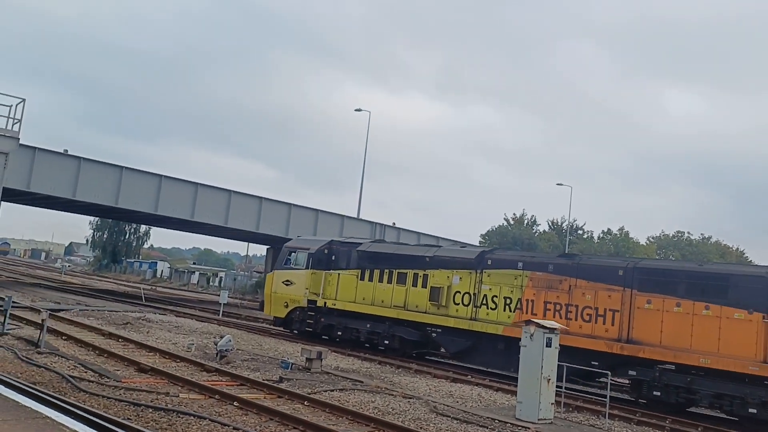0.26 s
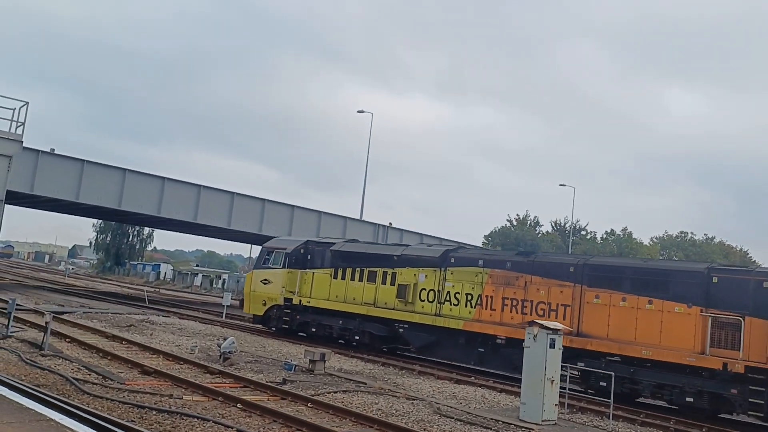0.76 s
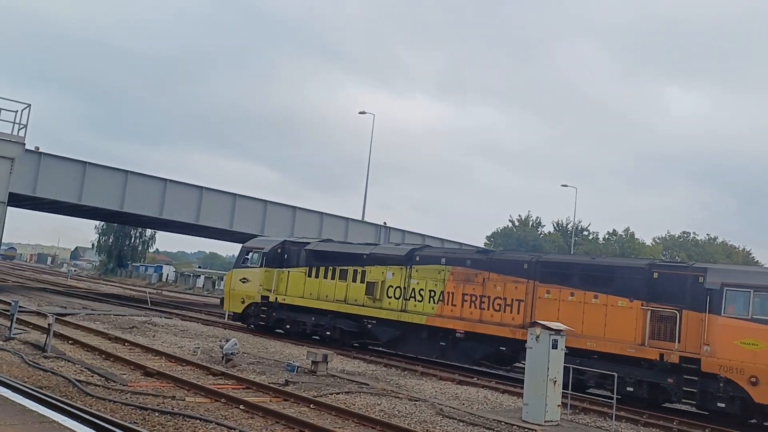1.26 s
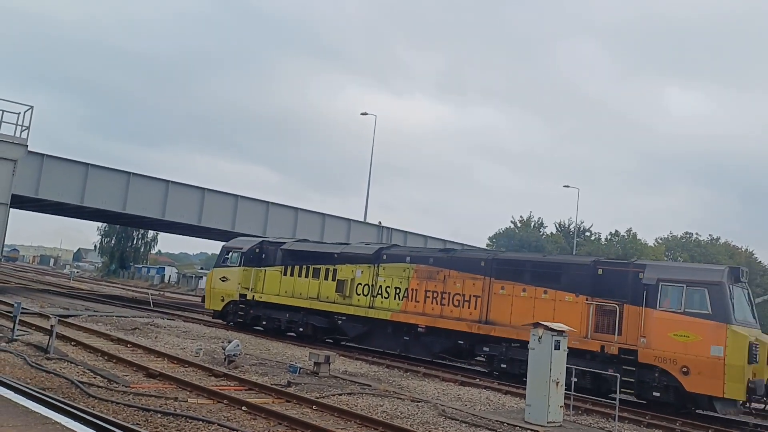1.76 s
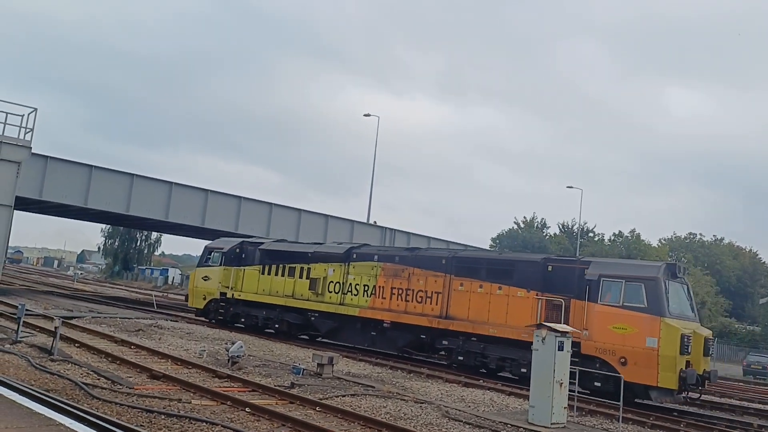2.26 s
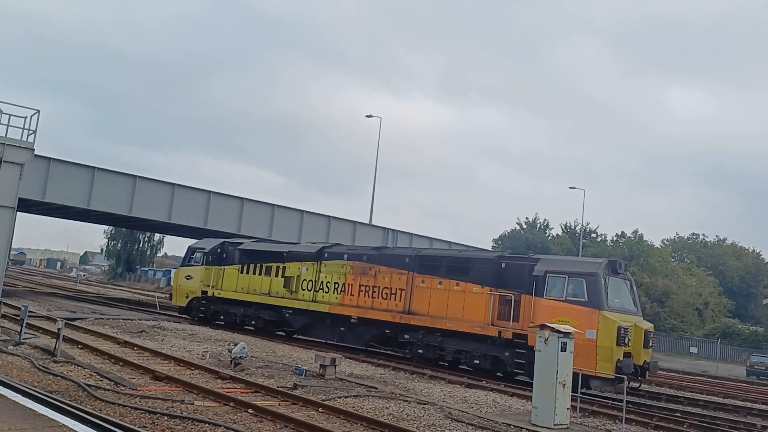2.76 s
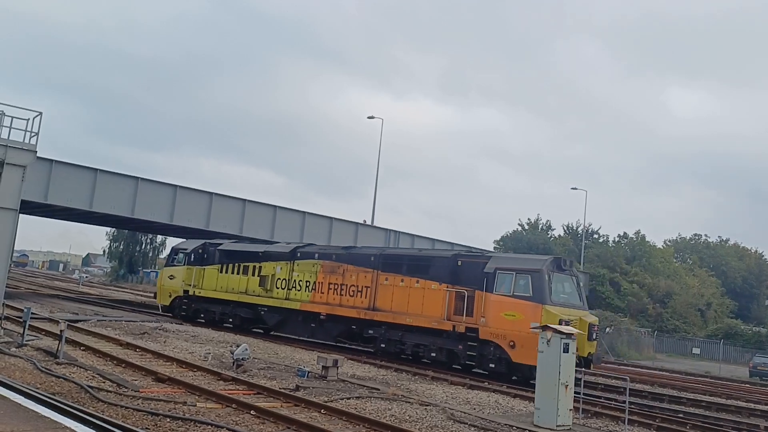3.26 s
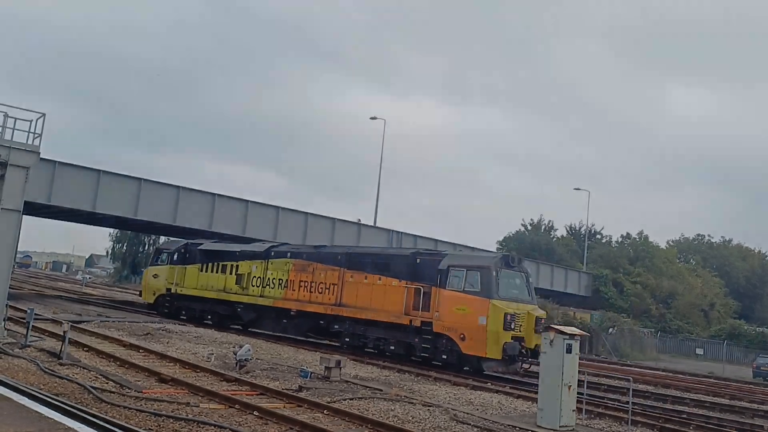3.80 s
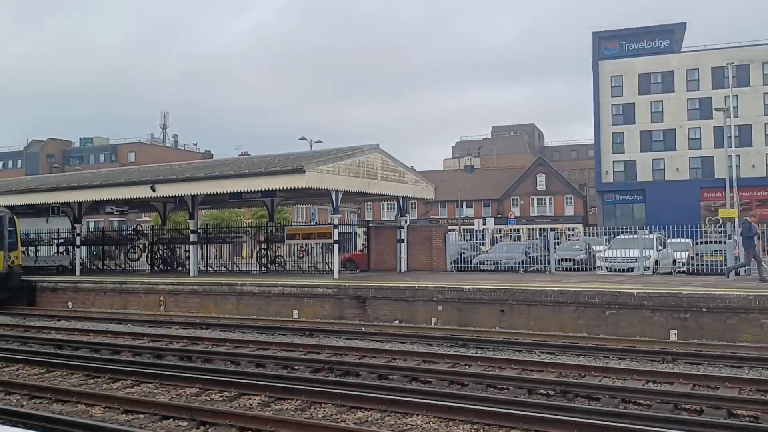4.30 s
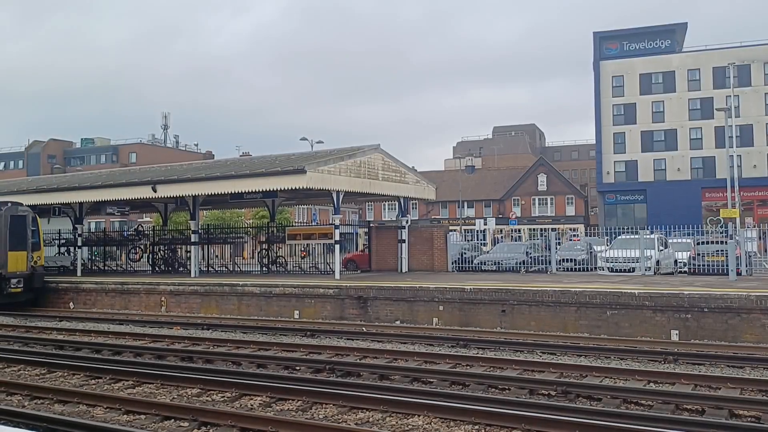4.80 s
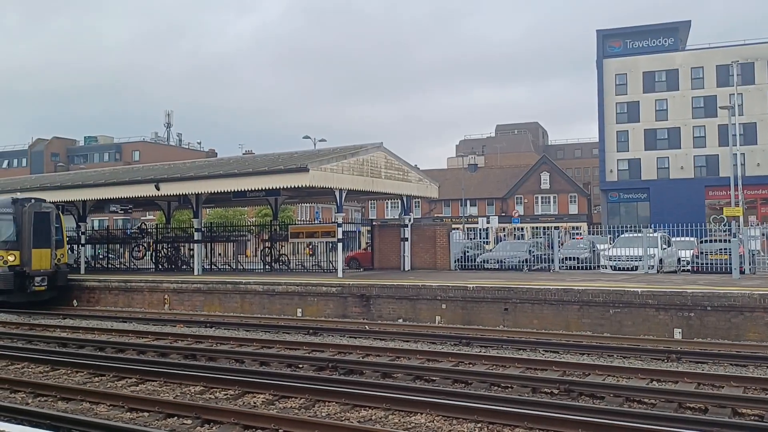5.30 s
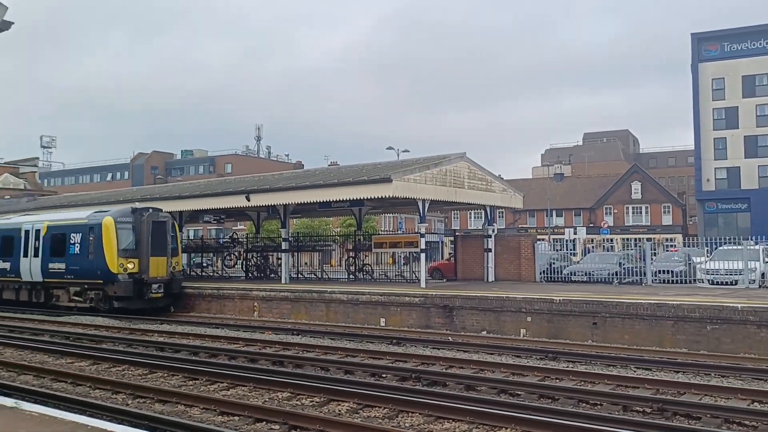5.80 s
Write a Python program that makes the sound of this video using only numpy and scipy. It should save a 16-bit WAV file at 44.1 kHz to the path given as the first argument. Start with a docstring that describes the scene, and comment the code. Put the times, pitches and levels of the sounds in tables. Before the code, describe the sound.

A diesel locomotive drones, whines, squeals and clunks over rail joints; after a cut, an engine idles and rails hiss under an arriving train.

```python
"""Diesel locomotive, then a station

A diesel locomotive rolls slowly away across a rail yard. Its uneven firings make the exhaust throb,
its gears whine higher, a wheel's rim (the flange) sticks and slips with a squeal, and the wheels
rumble over points and thump at rail joints. The sound is cut off. After a short silence a station
fades in: an engine idles further off and an electric train runs in, hissing on the rails."""
import sys
import numpy as np
from scipy import signal
from scipy.fft import rfft, irfft, next_fast_len
from scipy.io import wavfile
from scipy.ndimage import map_coordinates

SR = 44100
rng = np.random.default_rng(int(sys.argv[2]) if len(sys.argv) > 2 else 0)


def master(y):
    """Save y as 16-bit WAV."""
    cut = np.clip(np.atleast_2d(y).T, -1, 1)
    pcm = np.round(cut * 32767)  # scale
    wavfile.write(sys.argv[1], SR, pcm.astype(np.int16))


N = 266805
YARD, STATION, TRAIN = 0, 1, 2   # which part of a table to use


# An "order" is a tone at a whole multiple of the engine's cycle rate.
# Loudness of the main order: time_s, level_db
THROB = [(0, -23), (.55, -24.5), (.82, -19), (1.05, -27), (1.6, -21), (2.1, -27.5), (2.5, -19), (2.9, -23),
         (3.4, -18), (3.7, -18.5), (4.05, -25.5), (4.22, -35), (4.36, -45), (4.5, -37), (4.75, -26.5),
         (5.05, -24.5), (5.3, -27), (5.6, -24), (6.05, -27.5)]
# Orders with a loudness of their own: order, yard_db, yard_change_db_per_s, station_db
FREE_ORDERS = [(8, -29, -5, -49), (9, -33, -3.5, -41), (11, -24.5, -2.2, -36), (15, -34, .5, -28),
               (24, -35, .7, -37)]
# Weak orders that follow the main one: order, relative_db
WEAK_ORDERS = [(10, -13), (12, -34.5), (14, -18.5), (16, -26.5), (17, -26), (21, -31), (22, -22)]

def exhaust(place, cycle_hz, main_order=13):
    """Uneven firings repeat every cycle, making a stack of tones, staggered so that the drone wobbles."""
    main_db = in_time(THROB)[0]
    orders = [(main_order, main_db, .5)]
    orders += [(round(k), layer_db(place, *db) + 1.8 * drift(.29), 1.2) for k, *db in FREE_ORDERS]
    orders += [(round(k), main_db + db, 3) for k, db in WEAK_ORDERS]
    head_start_s = (.043, -.017)[place]
    return sum(sine(k * cycle_hz, db, waver_db, start_turns=k ** 2 / 16 + k * cycle_hz * head_start_s)
               for k, db, waver_db in orders)


# Five layers of engine noise, low to high. All but the first have a yard list and a station list.
# The tone colour of each: pitch_hz, relative_db
CHUFF_COLOUR = [(15, -41.5), (25, -13), (46, -2), (70, -2), (86, -2.5), (118, -2), (150, -6.5),
                (200, -47.5), (330, -120)]
RUMBLE_COLOUR = [(76, -45.5), (130, -15.5), (161, -8), (184, -2), (210, -5), (274, 2), (288, -5.5),
                 (335, -11.5), (430, -22.5), (560, -63), (950, -120)], [(76, -19), (130, -7), (150, -13),
                 (162, -9.5), (242, 0), (317, -4), (430, -11.5), (560, -17.5), (950, -120)]
ROAR_COLOUR = [(240, -31), (400, -15), (493, -3.5), (576, -3.5), (627, -1.5), (665, -4), (830, -2.5),
               (958, -12.5), (1070, -6), (1270, -6), (1330, -3), (1450, -13.5), (1570, -13), (1680, -17.5),
               (1900, -16), (2470, -26.5), (4180, -120)], [(240, -66), (400, -13), (523, -7.5),
               (543, -10.5), (607, -6), (661, -7), (869, -6.5), (1900, -17), (2470, -44), (4180, -120)]
FAN_COLOUR = [(1000, -32), (1700, -7.5), (2140, -3), (2390, -9), (2530, 2), (2660, 2), (3140, -3),
              (4090, -9.5), (4770, -5.5), (5450, -9.5), (5720, -6.5), (5960, -6), (6440, -10.5),
              (7510, -13.5), (9000, -24), (11700, -58), (19800, -120)], [(1000, -38), (1700, -13),
              (2020, -5), (2480, -2), (3560, -2.5), (4740, -7.5), (5410, -6.5), (6530, -17), (7880, -16),
              (9000, -32), (11700, -58), (19800, -120)]
LEAK_COLOUR = [(5000, -25.5), (8500, -9.5), (9240, -16.5), (10100, -13.5), (11300, -10.5), (12000, -9),
               (15800, -16)], [(5000, -34), (8500, -13), (9580, -6), (12100, -7), (14200, -8), (15800, -16)]
# Loudness of those five layers: yard_db, yard_change_db_per_s, station_db
LAYER_LEVELS = [(-26, -2, -30), (-31, 1.27, -33), (-33, -0.74, -37.5), (-45.5, -1, -48.5), (-64, -1, -69.5)]
# How unsteady each layer is: flicker_db, slow_wander_db
LAYER_FLICKER = [(1.5, 1), (1, 1), (.5, .7), (.6, .4), (.3, .3)]
# The rumble swells over points, where tracks branch: start_s, peak_db, hold_s
POINTS = [(-.05, -21.5, 0.022), (1.883, -24, 0.55), (2.598, -25, 0.17), (2.788, -21.5, 0.045),
          (3.185, -21.5, 0.2), (4.2, -34, 0.17), (5.553, -29, 0.032)]
# Soft puffs of escaping air: start_s, peak_db, hold_s
AIR_PUFFS = [(1.693, -65, .02), (1.94, -64, .03), (2.51, -68.5, .04), (3.17, -63.5, .2)]

def engine_noise(place):
    """Exhaust chuff, wheel rumble, roar, fan hiss and leaking air, returned as a low and a high part."""
    shared_flicker = drift(12)
    chuff, rumble, roar, fan, leak = (from_db(layer_db(place, *db)) for db in LAYER_LEVELS)
    # In the yard, fan and leak sink first as the engine draws away.
    dulling = from_db(-3 * seconds_after(2.8)) if place == YARD else 1
    points_power = sum(swell(s, db, .026, hold_s, 46.5) ** 2 for s, db, hold_s in POINTS)
    puffs_power = sum(swell(s, db, .02, hold_s, 147) ** 2 for s, db, hold_s in AIR_PUFFS)
    rumble = np.sqrt(rumble ** 2 + points_power)
    leak = np.sqrt((leak * dulling) ** 2 + puffs_power)
    gains = chuff, rumble, roar, fan * dulling, leak
    colours = (CHUFF_COLOUR, RUMBLE_COLOUR[place], ROAR_COLOUR[place],
               FAN_COLOUR[place], LEAK_COLOUR[place])
    layers = []
    for gain, colour, (flicker_db, wander_db) in zip(gains, colours, LAYER_FLICKER):
        unsteady_db = flicker_db * (shared_flicker + drift(40)) + wander_db * drift(1.9)
        layers.append(gain * from_db(unsteady_db) * noise(colour, place))
    return sum(layers[:2]), sum(layers[2:])


# Loudness of the gear whine: time_s, level_db
GEAR_LEVELS = [(0, -47.5), (.55, -29), (.85, -38), (1.1, -26), (1.35, -33.5), (1.55, -25.5), (1.7, -29.5),
               (1.8, -34.5), (1.95, -20.5), (2.3, -46.5), (2.7, -39.5)]

def gear_whine(start_hz=227.8, rise_hz_per_s=14.8):
    """Meshing gear teeth make a rising whine; a second, higher one soon fades."""
    hz = start_hz + rise_hz_per_s * clock()
    upper_db = -31 - 17.5 * seconds_after(.12)
    return sine(hz, in_time(GEAR_LEVELS)[0], waver_db=.6) + sine(hz * 4 / 3, upper_db, waver_db=1.5)


# Surges of the hum: start_s, peak_db, hold_s, fall_db_per_s
HUM_SURGES = [(2.044, -17, 0.1, 27.5), (2.398, -24.5, 0.12, 64.5), (2.673, -27, 0.054, 77),
              (2.829, -19.5, 0.07, 248), (3.075, -23.5, 0.025, 148), (3.244, -33, 0.28, 47),
              (3.676, -28, 0.15, 44)]
# Faint engine-room tones: pitch_hz, above_fan_db
ROOM_TONES = [(623, 3), (865, -4.5), (1262, -4.5)]

def engine_hum(hum_hz=277.3):
    """A hum surges again and again over faint tones that slowly sink with the fan hiss."""
    surges = [swell(s, db, .039, hold_s, fall) for s, db, hold_s, fall in HUM_SURGES]
    hum = np.max(surges, axis=0) * sine(hum_hz, 0, waver_db=.96)
    fan_db = layer_db(YARD, *LAYER_LEVELS[3])
    return hum + sum(sine(hz + 5.07 * drift(14.8), db + fan_db, waver_db=2.5) for hz, db in ROOM_TONES)


# Squealing notes: start_s, pitch_hz, glide_hz_per_s, level_db, attack_s, hold_s
SLIP_NOTES = [(.83, 2706, 100, -35, .035, .012), (.95, 1878, 260, -38, .07, .075),
              (.958, 3808, 0, -46, .012, .25), (.972, 3238, 0, -47, .012, .1),
              (1.3, 3808, 0, -55, .02, .12)]
# For each note, its harmonics from the lowest up: relative_db
SLIP_HARMONICS = (0, -11, -20), (0,), (0,), (0,), (0,)
# The flange bites, grinds and rubs again: start_s, relative_db, attack_s, hold_s, fall_db_per_s
FRICTION = [(0.851, -29.5, 0.008, 0.024, 79), (.87, -34.5, 0.05, 0.033, 85), (1.26, -47, 0.024, 0.025, 80)]
# Tone colour of the scraping: pitch_hz, relative_db
SCRAPE_COLOUR = [(1060, -41.5), (1800, -9), (2240, 14), (2360, -17.5), (2640, 13), (3930, -8), (4470, -9),
                 (4890, 4), (8760, -8.5), (9400, -6), (10500, 2), (11700, 3), (13500, 6.5), (14800, 0),
                 (15800, -2)]

def flange_squeal(glide_s=.17):
    """The flange sticks and slips on the rail fast enough to sing; it also scrapes and rings the wheel."""
    notes = np.zeros(N)
    for (s, start_hz, glide, db, attack_s, hold_s), harmonics in zip(SLIP_NOTES, SLIP_HARMONICS):
        hz = start_hz + glide * np.minimum(seconds_after(s), glide_s)
        gain = swell(s, db, attack_s, hold_s, fall_db_per_s=200)
        for k, harmonic_db in enumerate(harmonics, 1):
            notes += gain * sine(k * hz, harmonic_db, waver_db=1.1)
    friction = sum(swell(*rubbing) for rubbing in FRICTION)
    scrape = friction * from_db(-7) * noise(SCRAPE_COLOUR, YARD)
    return notes + arrive(scrape + wheel_ring(friction), lag_ms=-.047)


# A "mode" is a pitch at which an object rings; ring_s is the time it takes to fall by 60 dB.
# The wheel's modes: pitch_hz, relative_db, ring_s
WHEEL_MODES = [(2200, -3, .3), (2580, -6, .5), (3238, -4, 1.0), (3808, -5, 1.3), (4030, -4, .9),
               (4385, -11, .6), (4705, -6, .6), (5008, -1, .4), (5395, -10, .5), (5660, -7, .8),
               (6373, -2, .9), (6650, -10, .7), (7135, -14, .8), (7612, -16, .8), (7895, -14, .8),
               (8236, -4, .4), (9948, -13, .5), (10380, -11, .5), (10970, -4, .7), (11468, -4, .6),
               (11975, 0, .6), (12530, -1, .6), (13122, -6, .5), (13394, -7, .4), (13822, -6, .6),
               (14112, 3, .35), (14650, -1, .3), (14740, -2, .35), (15235, -8, .4), (15493, 2, .35)]

def wheel_ring(friction, start_s=.8, end_s=1.9, steadiness=.35):
    """Rubbing feeds energy into each mode of the wheel, where it builds up and dies away."""
    out = np.zeros((2, N))
    span = slice(int(start_s * SR), int(end_s * SR))
    shared, *each_ear = rng.standard_normal((3, N))[:, span]
    rub = shared + .8 * np.array(each_ear)
    for hz, db, ring_s in WHEEL_MODES:
        decay = from_db(-120 / (ring_s * SR))
        build_up = np.exp(-1 / (.045 * ring_s ** 2 * SR))   # long-ringing modes are slow to start
        feedback = np.convolve([1, -decay], [1, -build_up])
        energy = signal.lfilter([(1 - decay) * (1 - build_up)], feedback, friction[span] ** 2)
        blur_s = 1 / (1 + hz / 950)   # the turning wheel blurs each mode's pitch
        pole = from_db(-60 / (blur_s * SR)) * np.exp(2j * np.pi * hz / SR)
        mode = signal.lfilter([1], [1, -pole], rub)
        evened = rms_one(mode.real / np.abs(mode) ** steadiness)   # steady rubbing calms the wavering
        out[:, span] += from_db(db - 10.5) * np.sqrt(energy) * evened
    return out


# Wheels hit rail joints: start_s, relative_db, upper_modes_extra_db
RAIL_JOINTS = [(1.962, -27, -1), (2.079, -6.5, 3), (2.657, -18, -6), (2.726, -9, 2), (2.781, -4.5, 3),
               (2.835, -10, 8), (2.879, -14, -3), (3.058, -6, -2), (3.323, -10, 3), (3.373, -13.5, 14.5),
               (3.474, -11.5, 4), (5.262, -20, 9), (5.607, -17.5, 0)]
# Modes of the frame under the locomotive: pitch_hz, relative_db, ring_s
FRAME_MODES = [(185, 3, .25), (245, 0, .2), (345, -5, .1), (485, 2, .09), (700, 0, .05)]

def joint_thumps(push_s=.001, upper_from_hz=400):
    """A wheel drops at a rail joint, and the short, rough push rings the frame."""
    start_s, peak_db, extra_db = np.transpose(RAIL_JOINTS)
    hits = np.zeros((2, N))
    hits[:, (start_s * SR).astype(int)] = from_db([peak_db, peak_db + extra_db])
    decay = np.exp(-1 / (push_s * SR))
    push = signal.lfilter([1], [1, -2 * decay, decay * decay], hits + 1e-18) / (push_s * SR)
    low_push, upper_push = push * (1 + rng.standard_normal(N))
    return sum(from_db(db - 39.5) * ring(upper_push if hz > upper_from_hz else low_push, hz, ring_s)
               for hz, db, ring_s in FRAME_MODES)


# Loudness of the arriving train: time_s, hiss_db, treble_db
TRAIN_LEVELS = [(4.3, -54, -65), (5.25, -47.5, -61), (5.28, -41.5, -52), (5.33, -43.5, -53),
                (5.4, -43, -52), (5.47, -42, -47.5), (5.52, -41, -52), (5.57, -42.5, -45),
                (5.65, -43, -47.5), (5.72, -41.5, -50), (5.8, -42, -47.5), (6.05, -45, -49.5)]
# Tone colours of its rail hiss, treble and sizzle: pitch_hz, relative_db
RAIL_COLOUR = [(820, -16), (1400, 4.5), (1630, -4.5), (2220, -5), (2600, -3), (2980, -7), (3710, -7.5),
               (6300, -32), (8500, -48), (11000, -67), (18700, -120)]
TREBLE_COLOUR = [(3500, -16), (4200, -1.5), (5000, -3), (6000, -2.5), (6600, -12), (7500, -32)]
SIZZLE_COLOUR = [(8500, -18), (10300, -5), (11500, -2), (13000, -9), (15500, -25)]
# Gusts of sizzle: start_s, peak_db, hold_s
SIZZLE_GUSTS = [(5.508, -65.5, .02), (5.8, -61, .15)]
# Two swells of a thin tone: start_s, peak_db, attack_s, hold_s, fall_db_per_s
THIN_TONE_SWELLS = [(5.585, -37, .03, .065, 350), (5.71, -39.5, .09, .08, 25)]

def electric_train(tone_hz=1272):
    """The rails hiss as the train runs in, with gusts of brighter sizzle and a thin tone."""
    hiss_db, treble_db = in_time(TRAIN_LEVELS)
    hiss = from_db(hiss_db + .5 * drift(9.9)) * noise(RAIL_COLOUR, TRAIN)
    treble = from_db(treble_db) * noise(TREBLE_COLOUR, TRAIN)
    tone_gain = sum(swell(*row) for row in THIN_TONE_SWELLS) * pan(-4)
    tone = tone_gain * sine(tone_hz + 5 * drift(25), 0, waver_db=2.5)
    gusts = sum(swell(s, db, .084, hold_s, 80) for s, db, hold_s in SIZZLE_GUSTS)
    sizzle = (from_db(-76) + gusts) * noise(SIZZLE_COLOUR, TRAIN)
    return arrive(hiss + treble + sizzle + tone, lag_ms=-.28)


def station_drone():
    """A low drone swells once."""
    return swell(5.38, -30, attack_s=.22, hold_s=.05, fall_db_per_s=90) * sine(243, 0, waver_db=.81)


# The turbocharger's whistle: time_s, pitch_hz, level_db
TURBO_WHISTLE = [(0, 6200, -66), (.6, 6150, -77), (1.2, 5750, -62), (1.5, 5760, -54), (1.82, 5620, -54),
                 (2.1, 5900, -51), (2.45, 5880, -60), (2.8, 5760, -56), (3.15, 5950, -54),
                 (3.45, 5880, -54), (3.75, 5800, -62), (4.05, 5750, -74)]

def turbo_whistle(blur_hz=90):
    """A high tone, made breathy by fast random wavering that partly differs in each ear."""
    hz, db = in_time(TURBO_WHISTLE)
    tone = np.exp(2j * np.pi * np.cumsum(hz) / SR)
    shared, *each_ear = [drift(blur_hz) + 1j * drift(blur_hz) for _ in range(3)]
    return from_db(db) * np.real(tone * (shared + np.array(each_ear))) / 2


# Tone colour of the swish: pitch_hz, relative_db
SWISH_COLOUR = [(400, -15), (700, -19), (1500, -1), (2100, 0), (2400, -10), (2700, -10), (4000, -17),
                (6000, -18)]

def wheel_swish():
    """One brief swish comes from the wheels and axles."""
    return swell(3.17, -41, attack_s=.12, hold_s=.11, fall_db_per_s=80) * noise(SWISH_COLOUR, YARD)


# Small metal ticks: start_s, relative_db, left_minus_right_db
TICKS = [(0.118, -42, -2.0), (0.4794, -51, -7), (1.8831, -56, 5), (1.969, -59, -12), (2.553, -51, 2),
         (2.8665, -61, 19), (2.898, -30.5, 5), (2.922, -43.5, -11), (3.495, -52, -13), (3.526, -50, -6),
         (3.8726, -54, -9)]
# The modes they strike: pitch_hz, relative_db, ring_s
TICK_MODES = [(7400, -1, .05), (12100, -3, .06), (12800, -1, .04)]

def metal_ticks(crack_s=.004, tail_s=.025, band_hz=(7000, 14000)):
    """Each tick is a bright crack with a faint tail of hiss; it rings the same modes in its own mix."""
    start_s, peak_db, pan_db = np.transpose(TICKS)
    at = (start_s * SR).astype(int)
    scatter_db = rng.normal(0, 1.7, (len(at), len(TICK_MODES)))
    hits = np.zeros((2, N))
    hits[:, at] = from_db(peak_db) * pan(pan_db)
    crack, tail = (signal.lfilter([1], [1, -np.exp(-1 / (s * SR))], hits + 1e-18)
                   for s in (crack_s, tail_s))
    burst = (crack + from_db(-18) * tail) * rng.standard_normal(N)
    out = from_db(-4.5) * signal.sosfilt(signal.butter(3, band_hz, "band", fs=SR, output="sos"), burst)
    for k, (hz, db, ring_s) in enumerate(TICK_MODES):
        clicks = np.zeros((2, N))
        clicks[:, at] = hits[:, at] * from_db(db - 10 + scatter_db[:, k])
        out += ring(clicks, hz, ring_s)
    return out


# How alike the two ears are, for yard, station and train: pitch_hz, likeness (1 = the same)
EAR_LIKENESS = ([(60, .88), (200, .98), (320, .97), (400, 0.63), (650, 0.87), (1000, 0.5), (1500, 0.5),
                (2200, .5), (3100, .5), (5000, -0.01), (15000, 0.04)], [(60, 0.99), (200, 0.98), (400, 0.5),
                (650, 0.3), (1000, 0.5), (1500, 0.6), (2200, 0.5), (2800, .3), (3300, .6), (4000, 0.6),
                (5500, 0.15), (15000, 0.1)], [(800, .4), (1400, .5), (2200, .4), (3000, .15), (4000, .3),
                (5000, .1), (15000, .1)])
# Which ear is louder, for the same three: pitch_hz, left_minus_right_db
EAR_BALANCE = [(60, -8), (130, -2.5), (290, 0), (640, -1.5), (1410, -2.5), (3100, -1), (6820, -2.5),
               (15000, 0.5)], [(60, -4), (130, 7), (290, -0.5), (640, -2), (1410, -5), (3100, -5),
               (6820, -0.5), (8000, 9), (15000, 22)], [(800, 0), (1400, -7.5), (2200, -8.5), (3300, -15.5),
               (5000, -25), (6500, -15), (11000, -10), (15000, -6)]

def noise(colour, place):
    """Stereo noise of a given tone colour; the average of the two ears has strength (rms) 1."""
    size = next_fast_len(N)
    hz = np.arange(size // 2 + 1) * SR / size
    inside = (hz >= colour[0][0]) & (hz <= colour[-1][0])
    mid, side = rfft(rng.standard_normal((2, size))) * from_db(at_hz(colour, hz)) * inside
    alike = np.clip(at_hz(EAR_LIKENESS[place], hz), -.99, .99)
    pair = np.sqrt(1 + alike) * mid + np.sqrt(1 - alike) * side * [[1], [-1]]
    out = irfft(pair * pan(at_hz(EAR_BALANCE[place], hz)), size)[:, :N]
    return out / np.sqrt(np.mean(out.mean(axis=0) ** 2))


def sine(hz, db, waver_db, start_turns=None):
    """A pure tone whose strength wavers around db in moving air."""
    turns = np.cumsum(hz * np.ones(N)) / SR + (rng.random() if start_turns is None else start_turns)
    return np.sqrt(2) * from_db(db + waver_db * drift(13)) * np.sin(2 * np.pi * turns)


def ring(drive, hz, ring_s):
    """One mode: a click of height 1 starts a dying tone of height 1."""
    decay, step = from_db(-60 / (ring_s * SR)), 2 * np.pi * hz / SR
    return signal.lfilter([0, np.sin(step)], [1, -2 * decay * np.cos(step), decay ** 2], drive + 1e-18)


def arrive(pair, lag_ms):
    """Sound from one side reaches the left ear lag_ms after the right (before it, if negative)."""
    read_at = 8 + np.arange(N) - lag_ms * SR / 1000 * np.array([[.5], [-.5]])
    padded = np.pad(pair, ((0, 0), (16, 16)), "reflect", reflect_type="odd")
    return np.array([map_coordinates(ear, [at], order=3) for ear, at in zip(padded, read_at)])


def pan(left_minus_right_db):
    """Left and right gains that lean a sound to one side."""
    return from_db(left_minus_right_db * np.array([[.5], [-.5]]))


def swell(start_s, db, attack_s, hold_s, fall_db_per_s):
    """A gain that ramps up, holds, then dies at a steady rate."""
    rise = np.minimum(seconds_after(start_s) / attack_s, 1)
    return rise * from_db(db - fall_db_per_s * seconds_after(start_s + attack_s + hold_s))


def drift(rate_hz):
    """A smooth random wander, typically of size 1."""
    decay = np.exp(-80 * np.pi * rate_hz / SR)
    slow = signal.lfilter([1], [1, -2 * decay, decay ** 2], rng.standard_normal(N // 40 + 2002))[2000:]
    return np.interp(np.arange(N) / 40, np.arange(len(slow)), rms_one(slow))


def layer_db(place, yard_db, change_db_per_s, station_db):
    """In the yard a level changes steadily as the engine rolls on; at the station it stays put."""
    return station_db if place == STATION else yard_db + change_db_per_s * clock()


def in_time(rows):
    """Join a table's points over time, giving one curve per column."""
    time_s, *columns = np.transpose(rows)
    return [np.interp(clock(), time_s, column) for column in columns]


def at_hz(rows, hz):
    """Read a table between its pitches, on a log scale."""
    pitch_hz, values = np.transpose(rows)
    return np.interp(np.log(hz + 1), np.log(pitch_hz), values)


def clock():
    """Seconds at every sample."""
    return np.arange(N) / SR


def seconds_after(start_s):
    """Time since start_s, and zero before it."""
    return np.maximum(clock() - start_s, 0)


def from_db(db):
    """Turn decibels into a gain."""
    return 10 ** (np.asarray(db) / 20)


def rms_one(x):
    """Scale a signal to an average strength (rms) of 1."""
    return x / np.sqrt(np.mean(x ** 2) + 1e-20)


def scene(cut_s=4.0575, station_start_s=4.221, fade_in_s=.14):
    """The yard until the cut, a short silence, then the station."""
    thumps = joint_thumps()
    locomotive = exhaust(YARD, cycle_hz=5.805) + gear_whine() + engine_hum() + turbo_whistle()
    locomotive += thumps + sum(engine_noise(YARD)) + wheel_swish()
    lag_ms = .165 - .043 * clock()   # the locomotive moves leftwards
    yard = arrive(locomotive, lag_ms) + flange_squeal() + metal_ticks()
    drone = station_drone()
    low, high = engine_noise(STATION)
    idling = exhaust(STATION, cycle_hz=5.765) + low + arrive(high, lag_ms=-.34)
    station = idling + thumps + drone + electric_train()
    sink_and_cut = from_db(-4 * seconds_after(3.54)) * (clock() < cut_s)
    fade_in = np.sqrt(np.minimum(seconds_after(station_start_s) / fade_in_s, 1))
    return yard * sink_and_cut + station * fade_in


def record(dry, bass_edges_hz=(42, 35), top_hz=15760):
    """Trim the deepest bass, left and right each at its own edge, and the highest treble."""
    ears = [signal.sosfilt(signal.butter(2, hz, "high", fs=SR, output="sos"), ear)
            for hz, ear in zip(bass_edges_hz, dry)]
    return signal.sosfilt(signal.ellip(10, .5, 60, top_hz, fs=SR, output="sos"), ears)


dry = scene()
out = record(dry)
master(out)
```